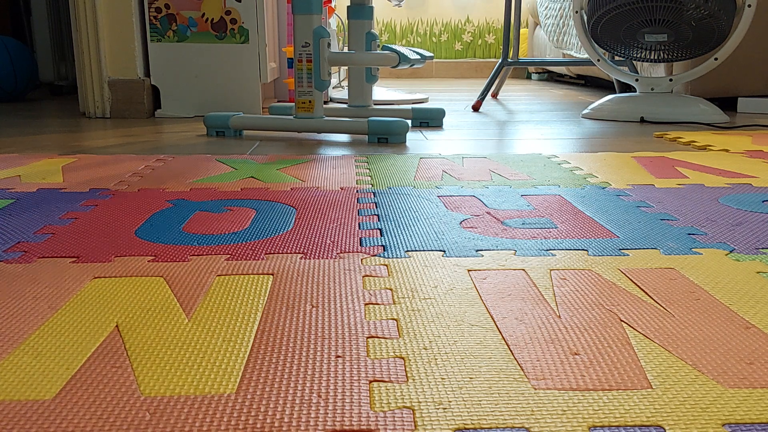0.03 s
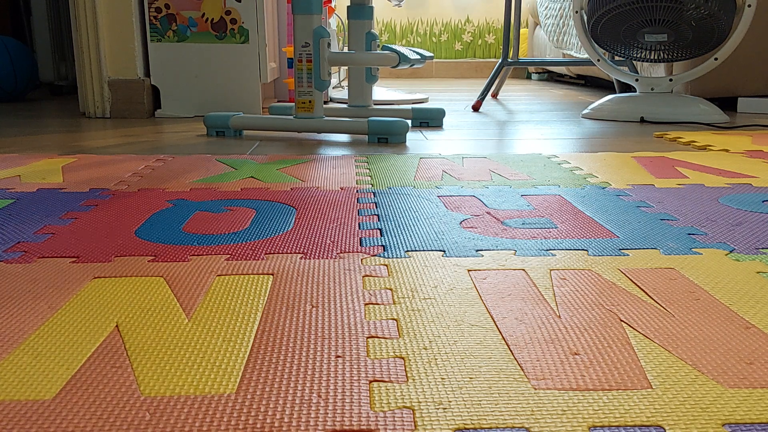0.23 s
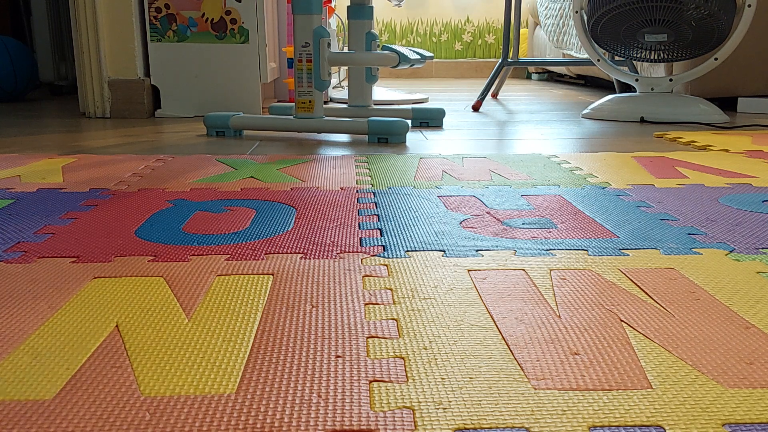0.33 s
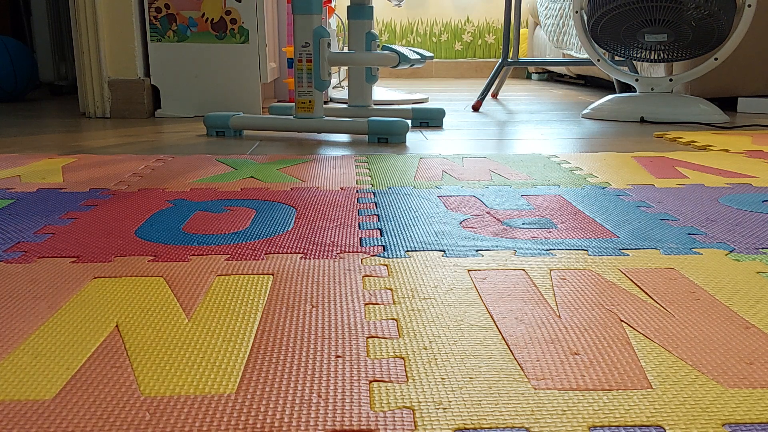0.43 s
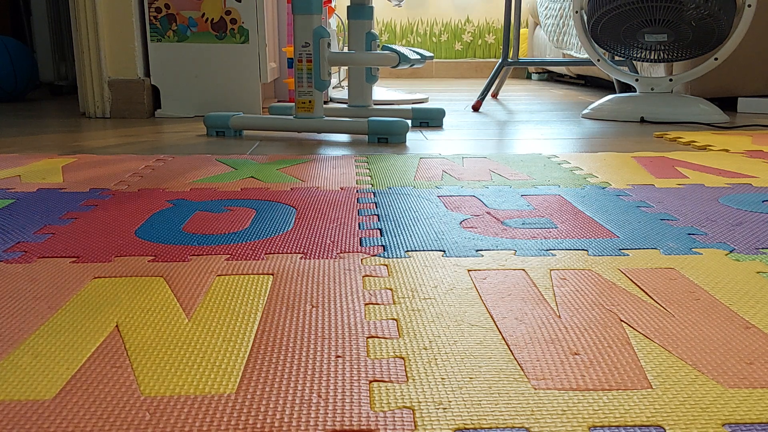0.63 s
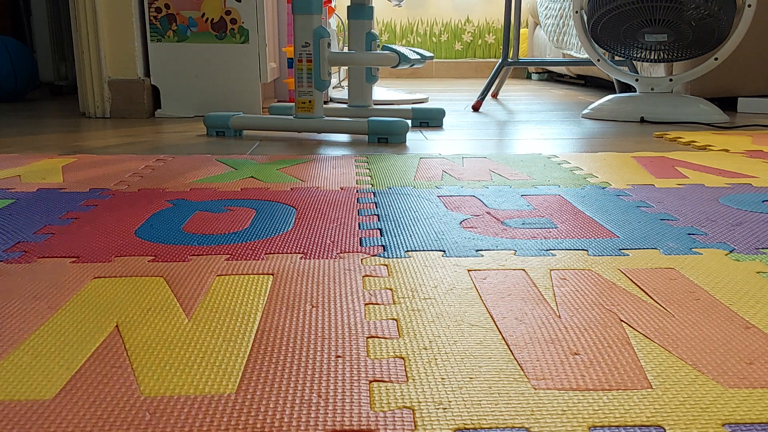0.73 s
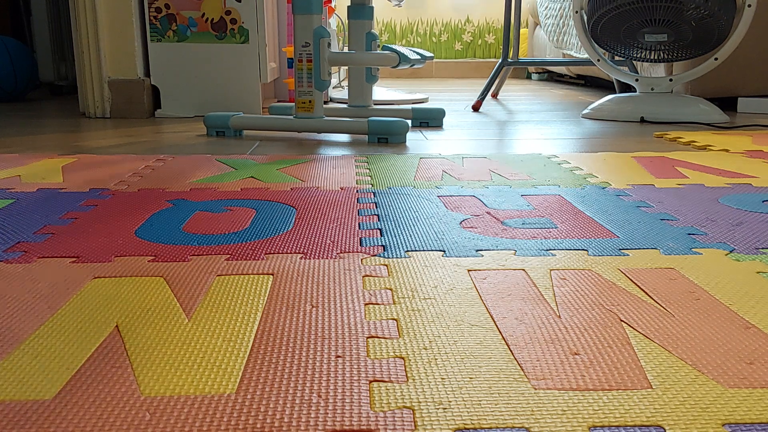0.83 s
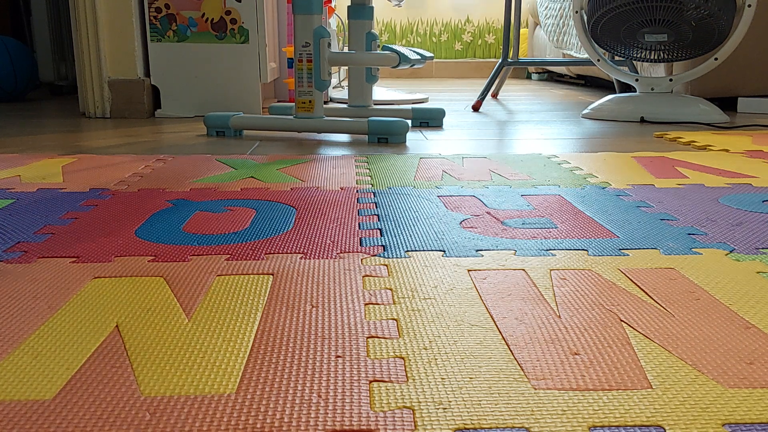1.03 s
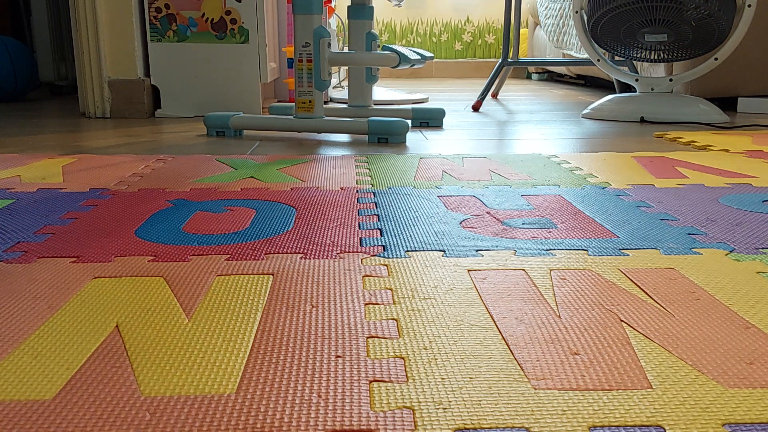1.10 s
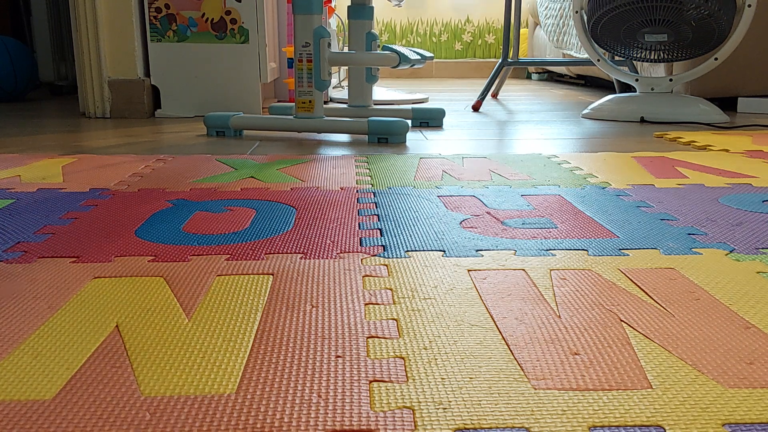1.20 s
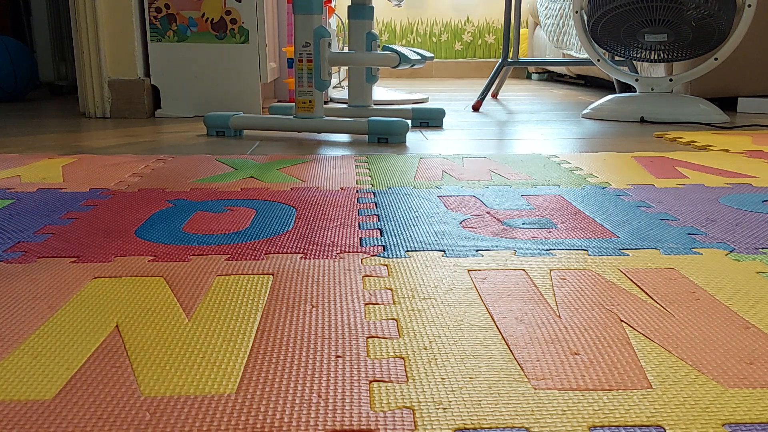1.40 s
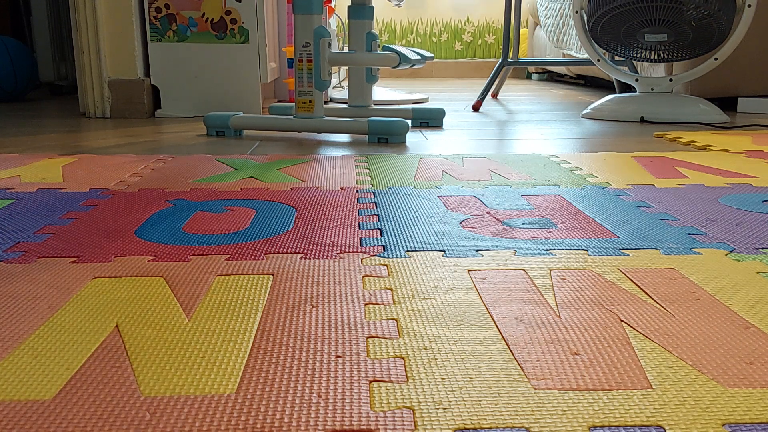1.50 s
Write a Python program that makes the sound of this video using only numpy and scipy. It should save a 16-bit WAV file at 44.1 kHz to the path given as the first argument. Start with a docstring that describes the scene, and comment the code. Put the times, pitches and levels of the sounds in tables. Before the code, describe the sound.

A dropped hollow object hits a foam mat with a loud, cracking thud that booms in a small room. Lighter knocks and clicks follow in two quick clusters as it tumbles and settles, heard in stereo over a low rumble.

```python
"""A steady low rumble and hum fill a small live room. A hard, hollow object drops onto a foam floor
mat with one heavy thud and a crack, and the room booms. The object rebounds, then clatters to rest with
light knocks, brushes and skids. Damped modes give the thud, the hollow body and the ringing shell;
gritty clicks give the contacts. The room answers every knock; two microphones a hand apart hear it."""
import sys
import numpy as np
from scipy import signal
from scipy.fft import rfft, irfft, next_fast_len
from scipy.io import wavfile

SR = 44100
rng = np.random.default_rng(int(sys.argv[2]) if len(sys.argv) > 2 else 0)


def unload_wav(signal):
    """Save mono or channel-first audio to the path in sys.argv[1] as 16-bit WAV at rate SR, clipped to [-1, 1]."""
    wavfile.write(
        sys.argv[1],
        SR,
        np.round(np.clip(np.atleast_2d(signal).T, -1, 1) * 32767).astype(np.int16),
    )


N = 68355
SIZE, CONTACT_SIZE = 24576, 2048  # samples in one event, in one click
AGE = np.arange(SIZE) / SR  # seconds since an event began

# tone of the room's rumble (frequency [Hz], gain [dB])
RUMBLE_EQ = [(20, -82), (35, -7.5), (52, -3), (80, 1), (102, -1.5), (125, -7), (160, -12), (200, -8),
             (270, -24), (450, -25.5), (800, -33), (1200, -32), (2000, -45.5), (5000, -59), (11000, -60),
             (16000, -60)]
# low hum in the room (frequency [Hz], level [dB])
HUM_TONES = [(80.7, -44), (102.3, -42.5), (156, -56.5), (199, -51.5)]

# the landing, heavily damped by the mat (frequency [Hz], level [dB], t60 [s])
THUD_MODES = [(190, -20, 0.012), (464, 0, 0.021), (1110, -15, 0.016), (1744, -16.5, 0.0066),
              (2254, -16, .01), (2880, -12, 0.0038)]
# weight of the thud (frequency [Hz], gain [dB])
THUD_EQ = [(40, -31), (90, -2.5), (140, -1.5), (560, -1), (800, -3.5), (1100, 0.5), (16000, 3.5)]
# bite of the landing's crack (frequency [Hz], gain [dB])
CRACK_EQ = [(200, -20), (800, 3), (1500, 7), (2500, 8), (4000, -1.5), (6500, -13), (10500, -8.5),
            (16000, -17)]
# snap of the slap (frequency [Hz], gain [dB])
SLAP_EQ = [(300, -11.5), (1500, -0.5), (3000, -2), (6000, -25), (8500, -14), (10000, 8), (12000, -9),
           (13500, -19), (16000, -29)]
# low boom of the room after the landing (frequency [Hz], level [dB], t60 [s])
BOOM_MODES = [(157.7, -18, .27), (202.2, -23.5, .28), (248.2, -25, 0.37), (369.3, -20, .25),
              (475, -20, 0.23), (496.5, -16, 0.17), (617, -34, 0.34)]
# lasting ring of the shell (frequency [Hz], level [dB], t60 [s])
SHELL_MODES = [(938, -13.5, 0.15), (1002, -15.5, 0.32), (1633, -4, 0.26), (1810, -14.5, 0.23),
               (1936, -2, 0.24), (2144, -4.5, 0.099), (2302, -2.5, 0.21), (2670, -6.5, 0.22),
               (2665, -5, 0.22), (2790, -10, 0.11), (3380, -8.5, 0.34)]

# length of the room's tail (frequency [Hz], t60 [s])
ROOM_DECAY = [(150, 0.35), (450, 0.3031), (1000, 0.33), (2500, 0.4), (6000, 0.3764), (14000, 0.26)]
# tone of the room's tail (frequency [Hz], gain [dB])
ROOM_EQ = [(100, 1), (400, 0.5), (800, -4.5), (1400, -1.5), (2300, 0.5), (5000, 0.5), (10000, 1),
           (16000, -1.5)]

# the tumble (time [s], body modes 1 to 4 [dB each], clack [dB], tick [dB], room send [dB])
KNOCK_CUES = [ (0.424, -36, -39.5, -37, -41, -27, -14.5, -0.5), (0.438, -58, -63, -66, -66, -58, -43, -5),
              (0.771, -20.5, -18, -45, -41, -5.5, -2.5, 6.5), (0.7765, -23, -44, -32, -34, -18, -11, 12),
              (0.782, -22, -29, -34, -39, -7, -8, 1.5), (0.7846, -14.5, -43, -31, -19, -28, -7, -15),
              (0.795, -23, -51, -36, -50, -20, -20, 9), (0.828, -22.5, -15.5, -26, -24, -3, -6.5, -3),
              (0.839, -46, -25.5, -33, -43, -12, -2.5, 1.5), (0.848, -54, -23, -29, -21.5, -4, -20, 1.5),
              (0.8743, -29, -24, -19, -46, -19, -6.5, -5), (0.879, -36, -22.5, -33, -50, -15, -12.5, 4),
              (0.887, -59, -42, -32, -20, -17, -5, -7.5), (1.024, -33, -32.5, -53, -38.5, -16, -24, 6),
              (1.144, -45, -41.5, -70, -52, -32, -44, 10), (1.1706, -50, -35, -23.5, -60, -14, -24, 4),
              (1.184, -47, -29.5, -54, -51.5, -41, -25, 0),
              (1.2266, -40, -46, -21.5, -23, -5.5, -16.5, 1.5), (1.239, -49, -47, -38, -26, -33, -18.5, -2),
              (1.272, -40, -23, -38, -57, -16, -24, 3), (1.281, -46, -45, -27, -30, -35, -28, 0),
              (1.2965, -36, -28.5, -40, -54, -14, -28, 12), (1.309, -50, -24.5, -36, -25, 5, -8, 1),
              (1.3197, -48, -42, -26.5, -24, 2.5, -5, -4)]
# four damped modes of the hollow body (frequency [Hz], t60 [s])
BODY_MODES = [(680, 0.015), (1010, 0.02), (1460, 0.018), (2050, 0.013)]
# tone of the hollow body (frequency [Hz], gain [dB])
BODY_EQ = [(100, -13), (350, -17), (560, -2.5), (2500, 2.5), (6000, -12.5), (16000, -18)]
# midrange clack of an edge (frequency [Hz], gain [dB])
CLACK_EQ = [(200, -25.5), (400, -38), (700, -13), (1200, -1.5), (1800, 3), (2700, 1), (4200, -8),
            (6500, -11.5), (16000, -53)]
# bright tick of an edge (frequency [Hz], gain [dB])
TICK_EQ = [(300, -41), (2000, 3.5), (4800, 0.5), (7500, -10), (10500, -2), (13000, -5.5), (16000, -8)]

# soft brushes of the shell against the mat (time [s], peak level [dB])
BRUSH_CUES = [(0.5, -45), (0.575, -56), (1.506, -54)]
# tone of a brush (frequency [Hz], gain [dB])
BRUSH_EQ = [(300, -21), (1500, -4), (2200, 3.5), (2700, 7.5), (3200, -12), (4200, -19), (6000, -41),
            (16000, -30)]
# skids between knocks (time [s], length [s], level [dB])
SKID_CUES = [(0.786, .105, -43.5), (1.225, 0.051, -50.5)]
# rasp of a skid (frequency [Hz], gain [dB])
SKID_EQ = [(200, -20), (400, -11), (650, 17.5), (1000, 16), (2500, 5), (4800, 5.5), (7500, -11),
           (10500, -12), (16000, -17)]
# glancing blows that wake a thin high ring (time [s], level [dB])
ZING_CUES = [(0.827, -52), (0.887, -43), (1.023, -61.5)]
# thin high ring of the shell (frequency [Hz], level [dB], t60 [s])
ZING_MODES = [(4170, -16, 0.2), (4580, -2.5, 0.27), (4860, -6, 0.17), (5362, -4, 0.17), (6070, -9, 0.1),
              (6950, -20, 0.19), (9040, -5, 0.26), (9700, -8.5, 0.24), (11700, -22, 0.11)]

DROP_S = 0.2277
CRACK_T60_S, CLACK_T60_S, TICK_T60_S = 0.021, 0.0163, 0.018
TUMBLE_LAG_MS, ROOM_PAN_DB = 0.27, -3


def amp(db):
    """Decibels to gain."""
    return 10 ** (np.asarray(db) / 20)


def fade(t60):
    """Exponential decay, 60 dB down after t60 seconds."""
    return np.exp(-np.log(1000) * AGE / t60)


def pan(db):
    """Left and right gains; positive leans left."""
    return amp([[db / 2], [-db / 2]])


def add(out, start, x):
    """Mix x into out from start seconds on."""
    i = int(start * SR)
    out[:, i:i + x.shape[1]] += x[:, :N - i]


def eq(x, points):
    """Minimum-phase EQ through (frequency [Hz], gain [dB]) points."""
    n = 2 * next_fast_len(x.shape[-1] // 2 + 512)
    hz, db = np.array(points).T
    log_hz = np.log(np.fft.rfftfreq(n, 1 / SR) + 1)
    cepstrum = irfft(np.log(amp(np.interp(log_hz, np.log(hz), db))))
    cepstrum[1:n // 2] *= 2
    cepstrum[n // 2 + 1:] = 0
    return irfft(rfft(x, n) * np.exp(rfft(cepstrum)))[..., :x.shape[-1]]


def diffuse(pair, corner_hz=800):
    """Two unrelated noises become a diffuse field: alike in the bass, wide in the treble."""
    n = pair.shape[1]
    alike = .98 / (1 + (np.fft.rfftfreq(n, 1 / SR) / corner_hz) ** 2) ** 2
    mid, side = rfft(pair) * np.sqrt([(1 + alike) / 2, (1 - alike) / 2])
    return irfft(np.array([mid + side, mid - side]), n)


def rumble(level_db=-37.5):
    """The room's steady bed of dark, diffuse noise."""
    bed = eq(diffuse(rng.standard_normal((2, N + SIZE))), RUMBLE_EQ)[:, SIZE:]
    return bed / np.std(bed) * amp(level_db) * pan(-1)


def hum(waver=0.25, waver_step_s=0.188):
    """A few low tones that waver slowly in level and phase."""
    t = np.arange(N) / SR
    out = 0
    for hz, db in HUM_TONES:
        drift = rng.standard_normal((2, 32))
        sway = np.interp(t, np.arange(32) * waver_step_s, drift[0] + 1j * drift[1])
        tone = np.exp(2j * np.pi * (hz * t + rng.random()))
        out = out + amp(db) * np.real((1 + waver * sway) * tone)
    return out


def landing(slap_after_s=0.0025, boom_rise_s=0.01):
    """The object hits the mat: thud, crack and slap, then the room booms and the shell rings."""
    thud = -eq(ring(THUD_MODES), THUD_EQ)
    # the rest of the face slaps down just after the first edge
    slap = amp(3.5) * eq(contact(TICK_T60_S), SLAP_EQ)
    slap = np.interp(AGE - slap_after_s, AGE, slap, left=0)
    crack = -amp(8) * eq(contact(CRACK_T60_S), CRACK_EQ)
    boom = ring(BOOM_MODES) * (1 - np.exp(-AGE / boom_rise_s))
    send = amp(-2) * thud + amp(2) * crack
    impact = in_room(thud + crack + slap, send, lag_ms=0.035, pan_db=-3.5)
    return impact + boom + amp(-32) * shell(SHELL_MODES)


def ring(modes, pitch=1, uneven=0):
    """Struck modes die away as damped sines; uneven scatters their strengths."""
    strengths = 1 + uneven * rng.standard_normal(len(modes))
    return sum(strength * amp(db) * fade(t60) * np.sin(2 * np.pi * hz * pitch * AGE)
               for strength, (hz, db, t60) in zip(strengths, modes))


def contact(t60, grit=0.7):
    """A click smeared into a brief, gritty crackle with an even spectrum."""
    click = (rng.standard_normal(SIZE) * fade(t60))[:CONTACT_SIZE]
    click *= np.sqrt(grit / np.sum(click ** 2))
    click[0] += np.sqrt(1 - grit)
    for _ in range(4):  # whiten it while keeping it short
        click = irfft(np.exp(1j * np.angle(rfft(click)))) * (AGE[:CONTACT_SIZE] < t60)
    return np.pad(click, (0, SIZE - CONTACT_SIZE))


def shell(modes):
    """The shell rings on, differently towards each microphone."""
    return np.array([ring(modes, uneven=.35) for _ in range(2)]) * pan(ROOM_PAN_DB)


def room(gap_s=0.0028, build_s=0.002, echo_spread_db=4, echo_merge_s=0.053):
    """Separate echoes thicken into a tail; each place on the floor has its own pattern."""
    noise = rng.standard_normal((2, SIZE))
    spread = np.log(amp(echo_spread_db)) * np.exp(-AGE / echo_merge_s)
    pattern = np.repeat(rng.standard_normal((2, SIZE // 16)), 16, axis=1)
    echoes = np.exp(spread * pattern - spread ** 2)
    spectrum = rfft(diffuse(noise * echoes))
    hz, t60s = np.array(ROOM_DECAY).T
    log_hz = np.log(np.fft.rfftfreq(SIZE, 1 / SR) + 1)
    bands = [np.interp(log_hz, np.log(hz), peak) for peak in np.eye(len(hz))]
    tail = sum(irfft(spectrum * band) * fade(t60) for band, t60 in zip(bands, t60s))
    tail *= 1 - np.exp(-np.maximum(AGE - gap_s, 0) / build_s)
    tail /= np.sqrt(np.sum(tail ** 2) / 2)
    return eq(tail, ROOM_EQ) * pan(ROOM_PAN_DB)


def in_room(x, send, lag_ms, pan_db=0):
    """Direct sound, later at the right microphone, plus the room's answer to the send."""
    direct = np.array([x, np.interp(AGE - lag_ms / 1000, AGE, x, left=0)])
    reverb = signal.fftconvolve(send[None], room(), axes=1)[:, :SIZE]
    return direct * pan(pan_db) + reverb


def knock(mode_dbs, clack_db, tick_db, room_db, pitch_scatter=0.037):
    """An edge hits the floor: hollow knock, clack, bright tick and a little ring."""
    modes = [(hz, db, t60) for (hz, t60), db in zip(BODY_MODES, mode_dbs)]
    body = eq(ring(modes, pitch=1 + pitch_scatter * rng.standard_normal()), BODY_EQ)
    clack = amp(clack_db) * eq(contact(CLACK_T60_S), CLACK_EQ)
    tick = amp(tick_db) * eq(contact(TICK_T60_S), TICK_EQ)
    send = amp(room_db) * (amp(-5.5) * body + clack + tick)
    ring_out = amp(clack_db - 41) * shell(SHELL_MODES)
    return in_room(body + clack + tick, send, TUMBLE_LAG_MS) + ring_out


def brush(db, rise_s=0.017, t60_s=0.18):
    """The shell rubs the mat: soft noise that swells and dies away."""
    envelope = (1 - np.exp(-AGE / rise_s)) * fade(t60_s)
    rub = eq(rng.standard_normal((2, SIZE)), BRUSH_EQ) * envelope
    return rub / np.abs(rub).max() * amp(db)


def skid(length, db, grains_per_s=610):
    """Dense tiny collisions rasp while the object slides."""
    chance = grains_per_s / SR
    grains = (rng.random(SIZE) < chance) * rng.standard_normal(SIZE) / np.sqrt(chance)
    rasp = amp(db) * eq(grains * (AGE < length), SKID_EQ)
    return in_room(rasp, send=rasp, lag_ms=TUMBLE_LAG_MS)


def zing(db):
    """A glancing blow wakes the shell's thin, high modes."""
    return amp(db) * shell(ZING_MODES)


def scene():
    """A bed of rumble and hum, with the landing and the tumble on top."""
    out = rumble() + hum()
    add(out, DROP_S, landing())
    for start, db in ZING_CUES:
        add(out, start, zing(db))
    for start, db in BRUSH_CUES:
        add(out, start, brush(db))
    for start, length, db in SKID_CUES:
        add(out, start, skid(length, db))
    for start, *mode_dbs, clack_db, tick_db, room_db in KNOCK_CUES:
        add(out, start, knock(mode_dbs, clack_db, tick_db, room_db))
    return out


def record(dry):
    """Flatten the loudest peak and cut the very top of the treble."""
    ceiling, top_hz = 0.85, 15900
    lowpass = signal.ellip(8, .2, 70, top_hz, fs=SR, output="sos")
    return signal.sosfilt(lowpass, np.clip(dry, -ceiling, ceiling))


dry = scene()
out = record(dry)
unload_wav(out)
```